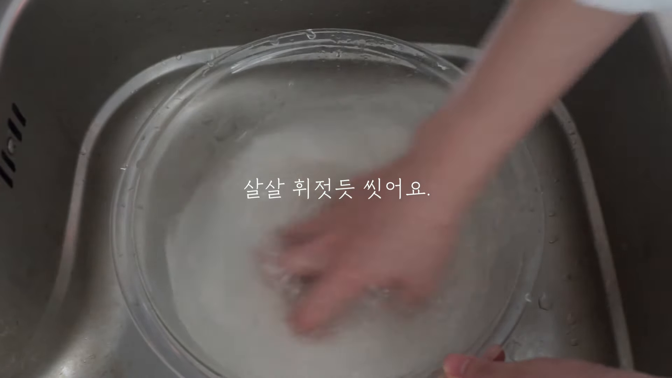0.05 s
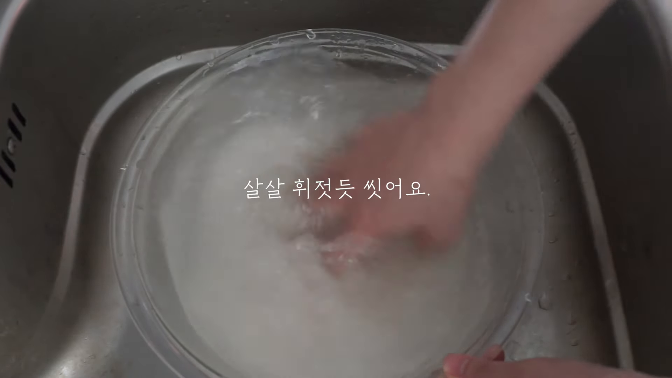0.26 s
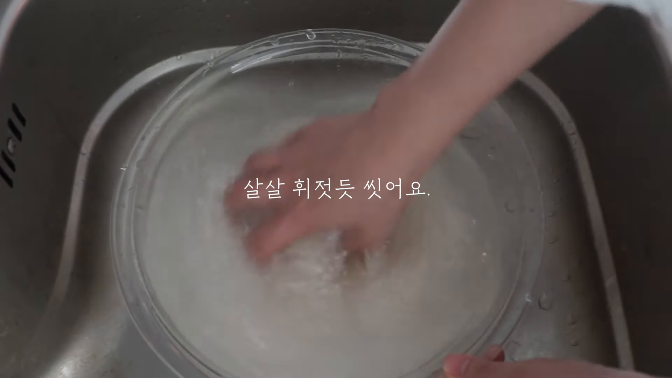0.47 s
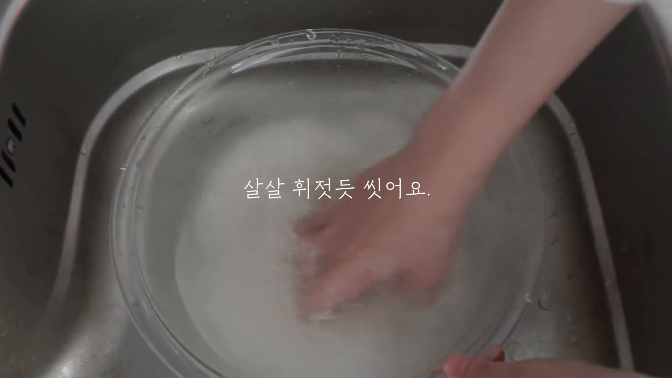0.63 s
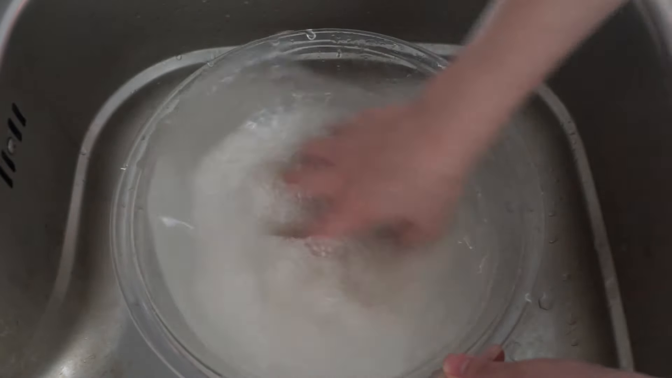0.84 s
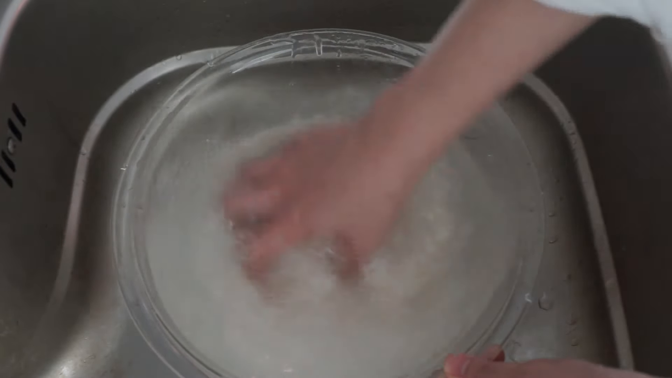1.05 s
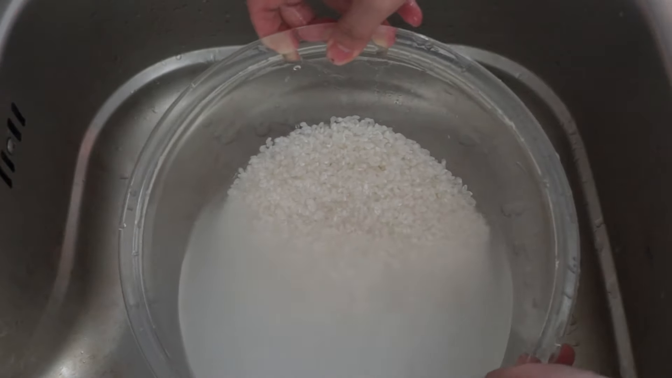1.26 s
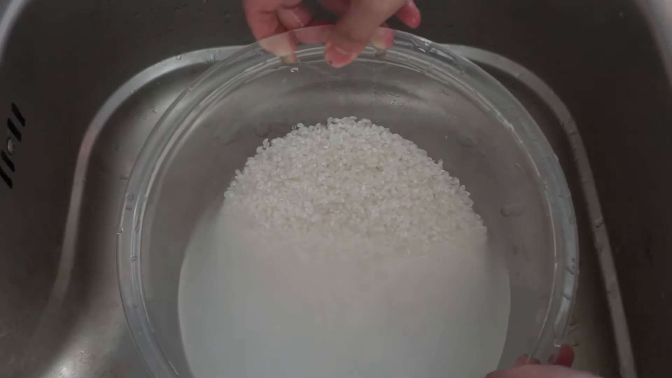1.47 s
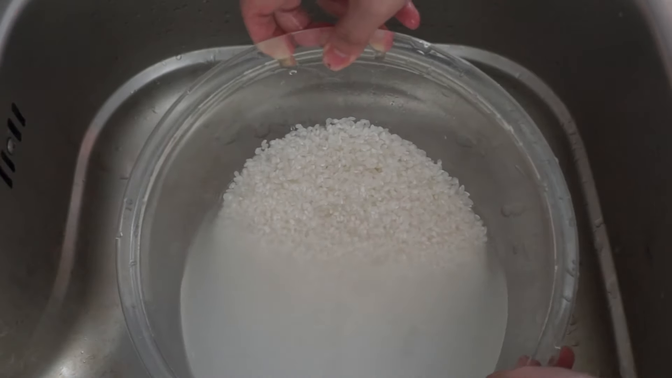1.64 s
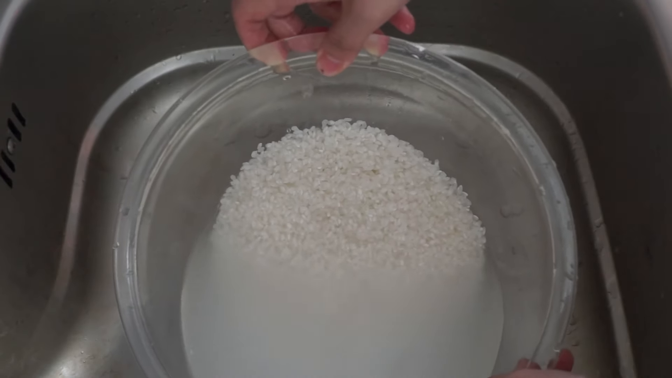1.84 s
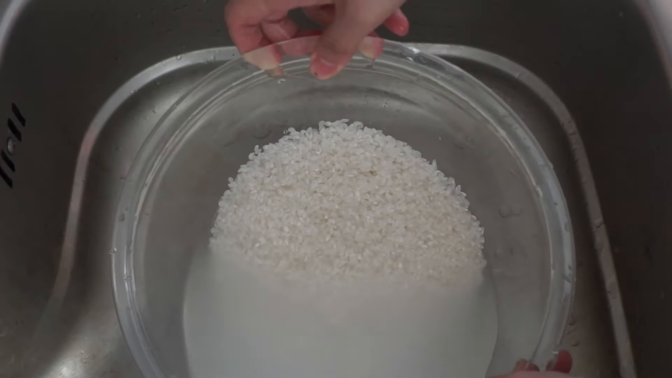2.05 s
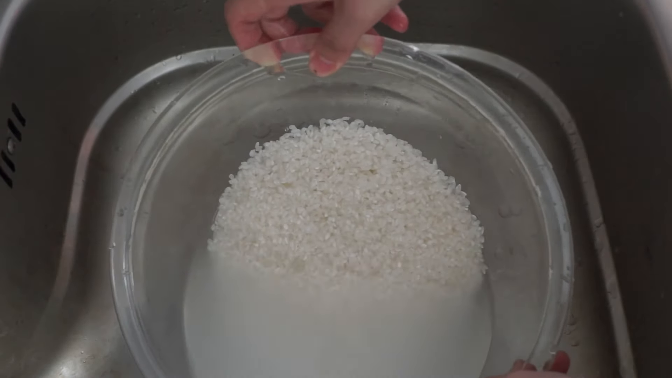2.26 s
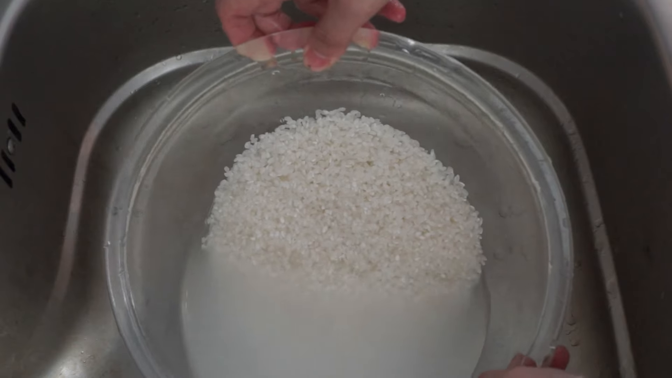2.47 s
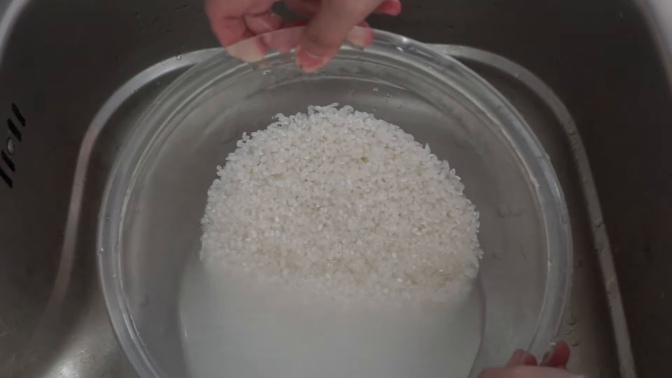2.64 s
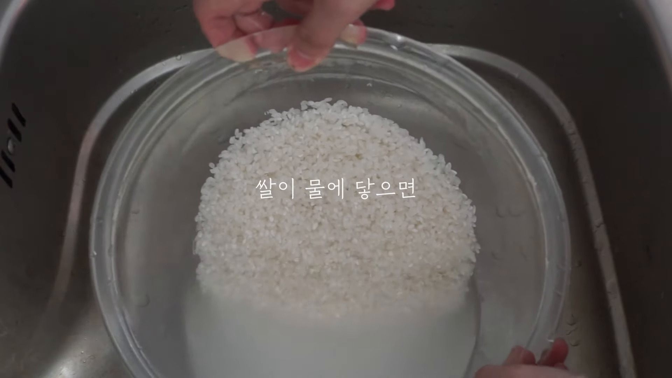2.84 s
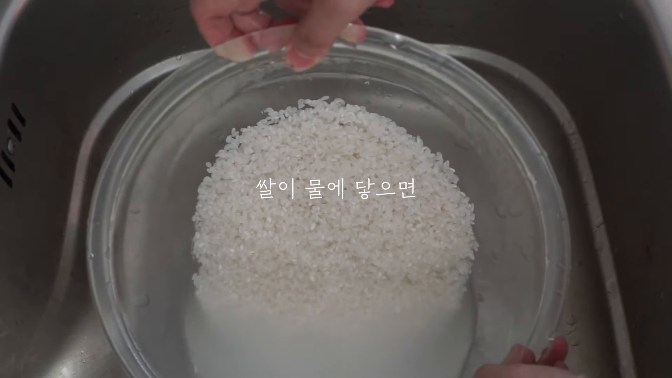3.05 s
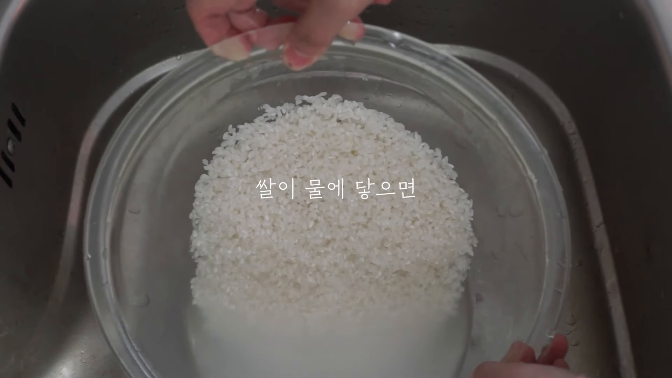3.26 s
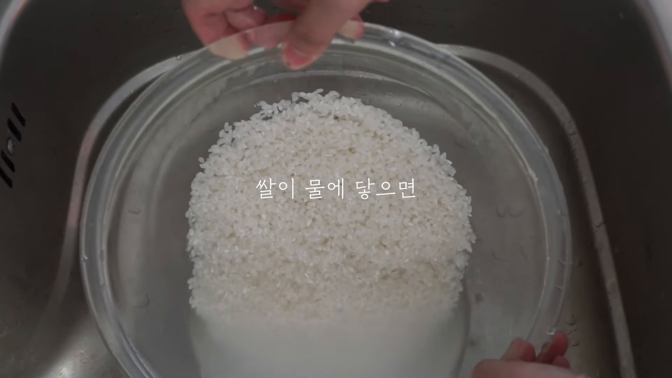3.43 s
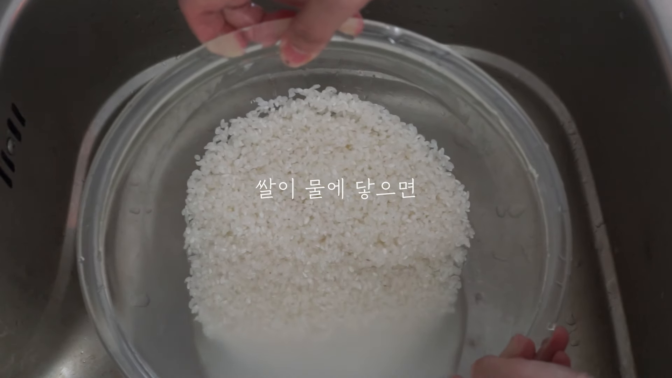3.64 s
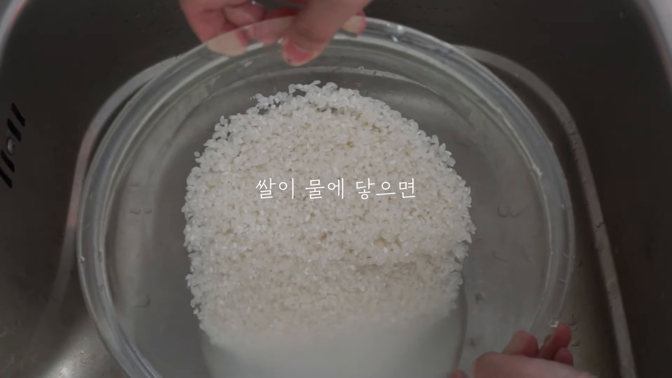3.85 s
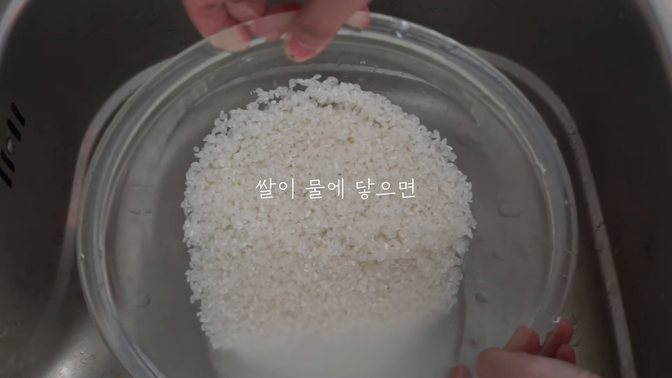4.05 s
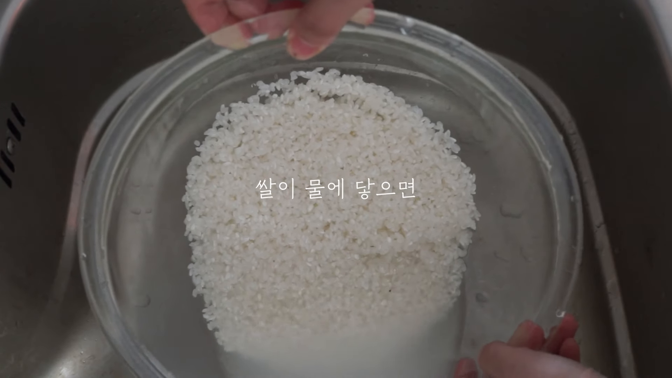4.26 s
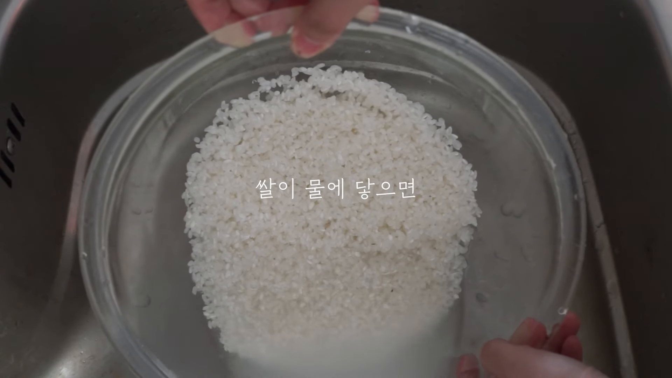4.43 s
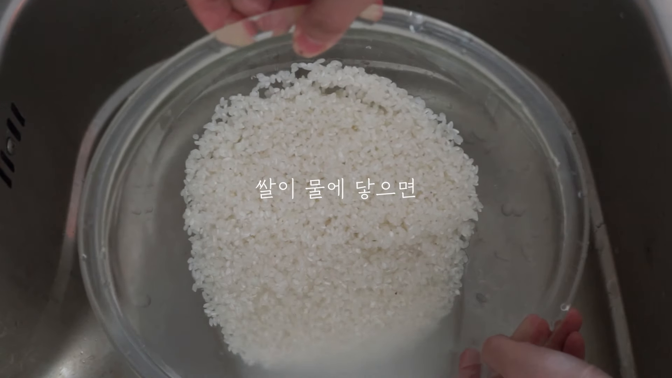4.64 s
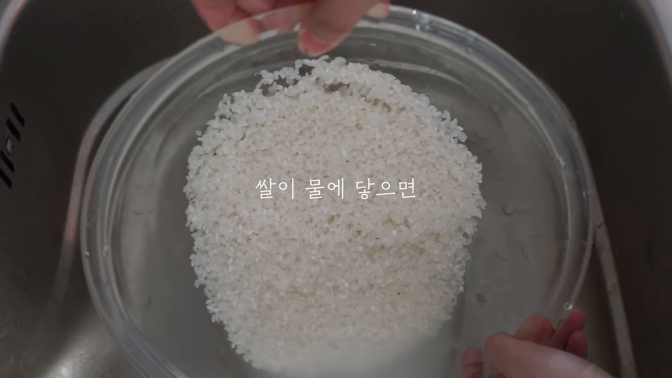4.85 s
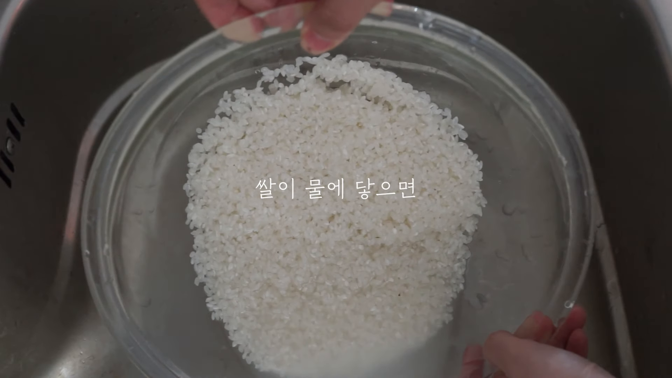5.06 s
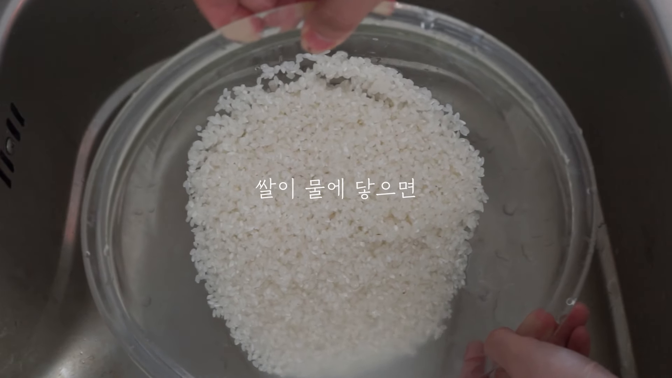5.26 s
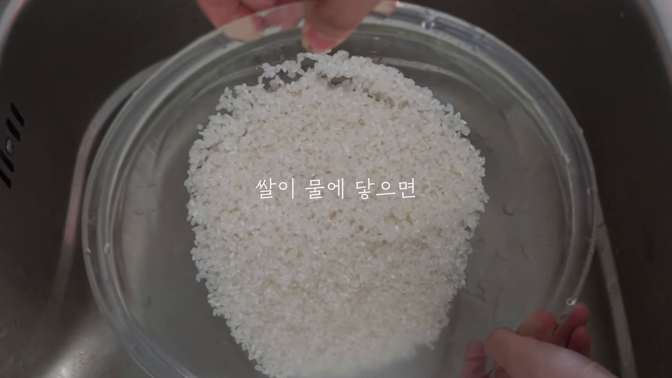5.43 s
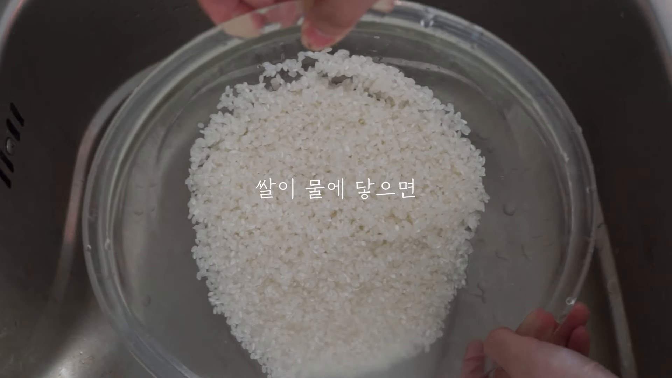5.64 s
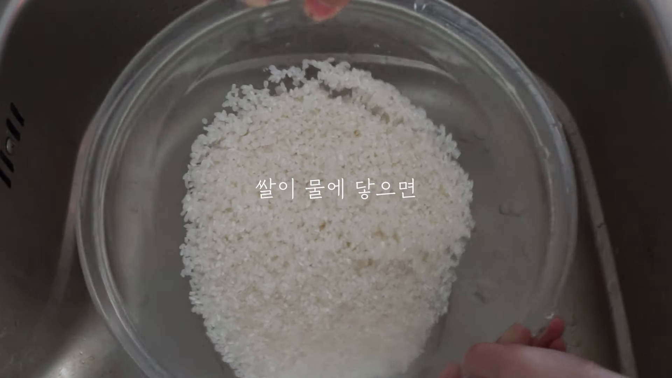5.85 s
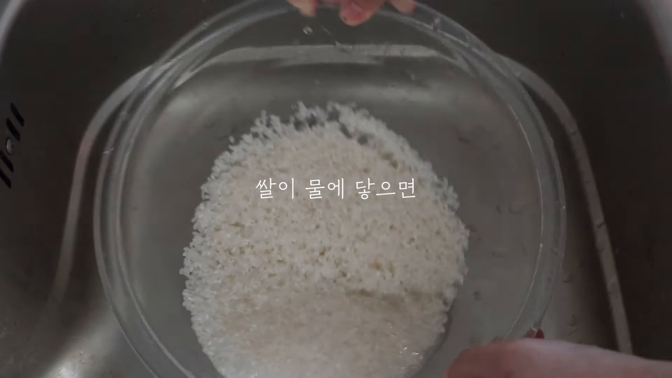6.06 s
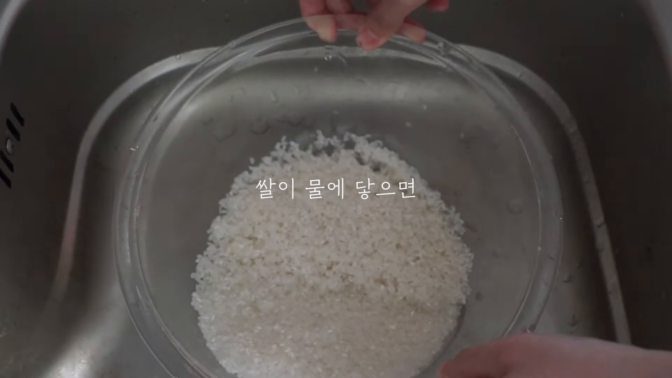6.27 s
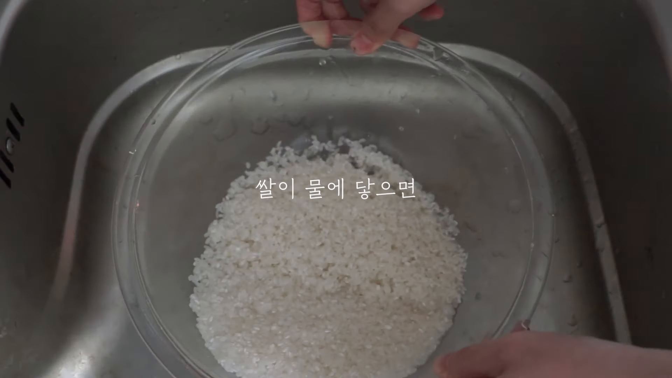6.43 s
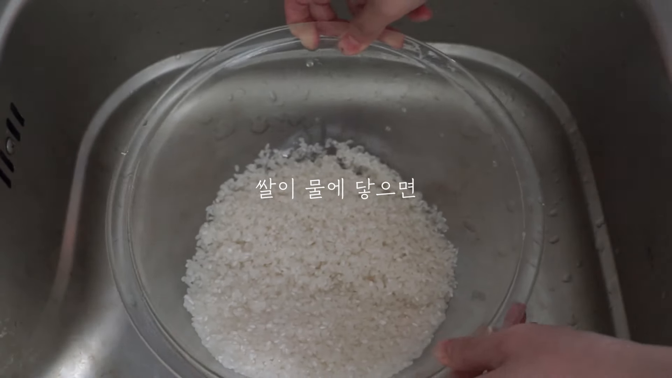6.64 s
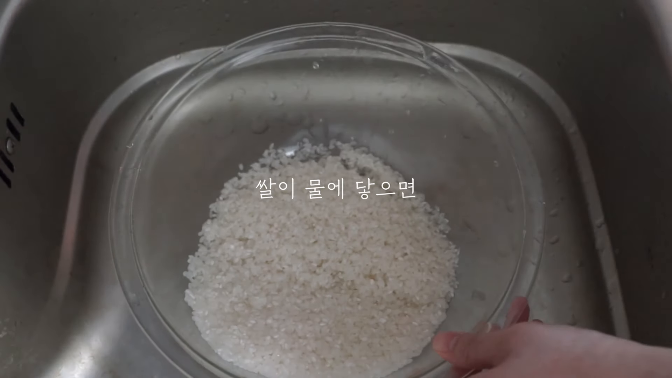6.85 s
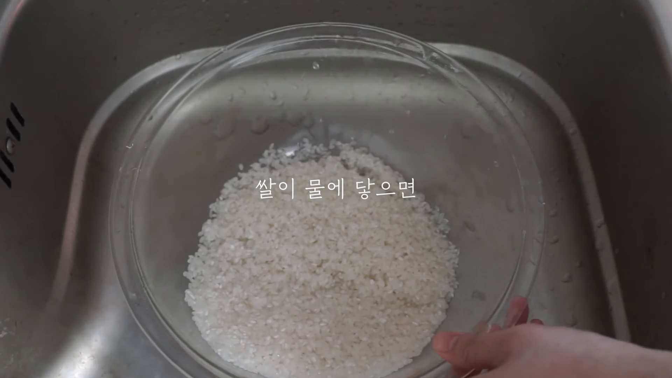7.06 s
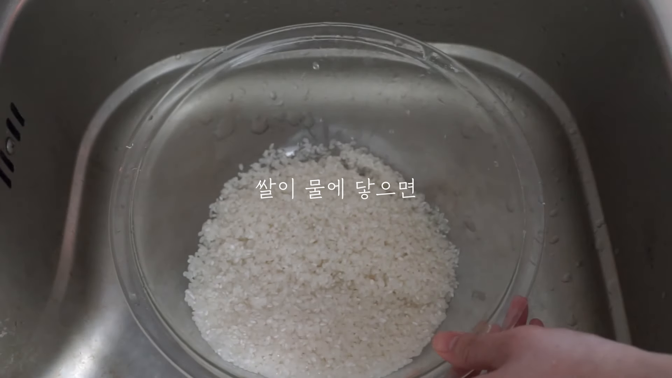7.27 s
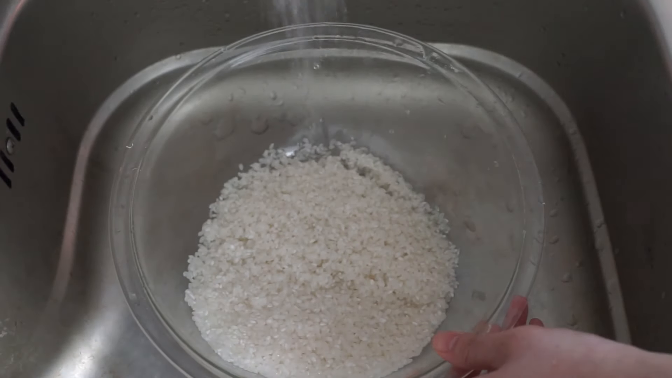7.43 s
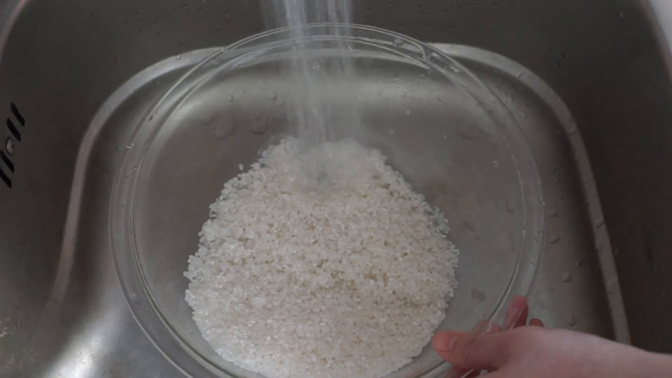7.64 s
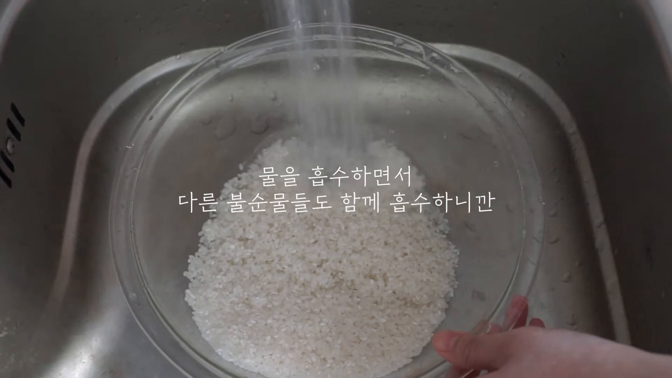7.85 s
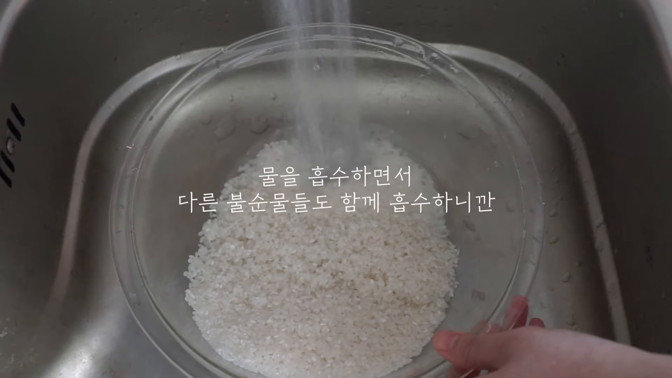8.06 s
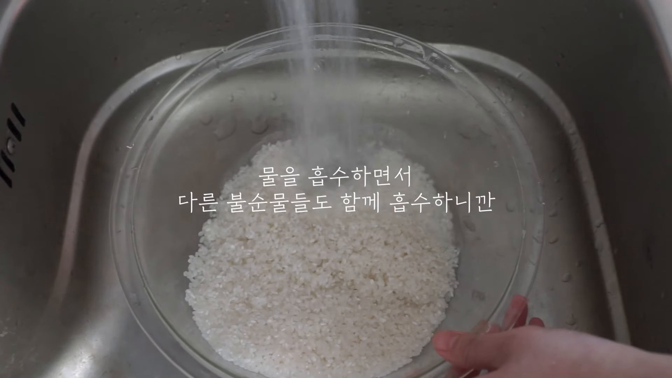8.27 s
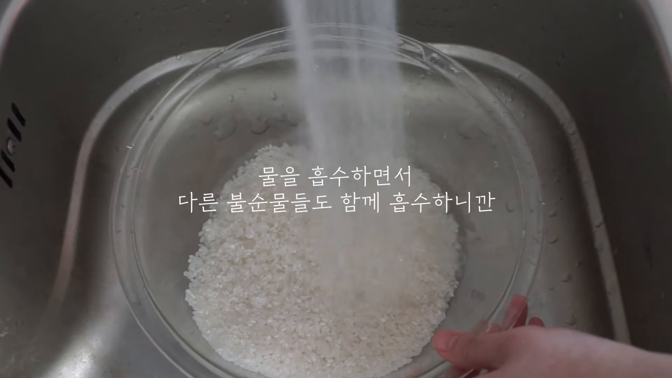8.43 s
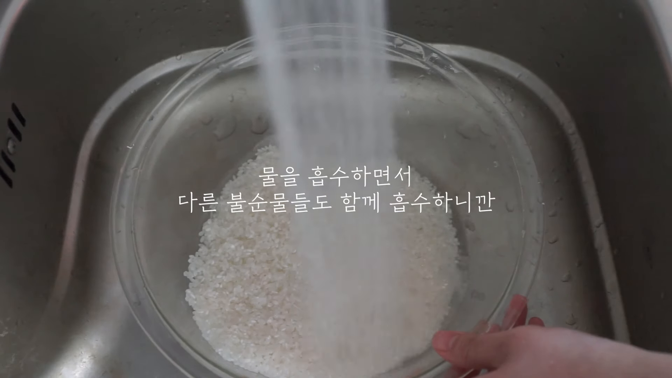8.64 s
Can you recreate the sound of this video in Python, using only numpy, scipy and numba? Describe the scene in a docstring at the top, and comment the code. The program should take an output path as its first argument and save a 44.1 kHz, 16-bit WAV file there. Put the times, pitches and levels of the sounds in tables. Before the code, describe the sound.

Lively wet swirling and gulping for about a second, then a hard cut to water spilling from a bowl onto a ringing steel sink floor, bubbling, splashing and slowly dwindling to a trickle. Two glass-on-metal knocks follow, a short pause, several sharp tap spurts, then a steady bright hiss with low glugs. Close stereo microphone, small reflective kitchen, soft room hum.

```python
"""A hand swishes rice in a glass bowl of water: bubble clouds, gulps and a crackle of noise droplets.
The bowl is tilted and water patters into a steel sink, thinning to a trickle: resonators, bubbles and spray.
The bowl is set down with two knocks: noise cracks over damped modes. The tap then spits noise bursts and
sprays onto the rice, hissing and glugging. Basin echoes, a room tail and a faint kitchen hum surround it all."""
import sys
import numpy as np
from scipy import signal
from scipy.fft import rfft, irfft
from scipy.io import wavfile
from scipy.ndimage import uniform_filter1d
from numba import njit

SR = 44100
rng = np.random.default_rng(int(sys.argv[2]) if len(sys.argv) > 2 else 0)


def file_out(sig):
    """Save sig as 16-bit WAV at sys.argv[1]."""
    # one column per channel
    cols = np.atleast_2d(sig).T
    # limit, then scale
    lim = np.clip(cols, -1, 1)
    pcm = np.round(lim * 32767).astype(np.int16)
    wavfile.write(sys.argv[1], SR, pcm)


N = 383669

STIR_END_S, TAP_ON_S = 1.175, 7.279

# Air pockets closing under the hand. Each row: start in seconds, level in dB, pitch in Hz, splash level in dB.
SLOSH_EVENTS = [(0.007, -8, 1130, -12), (0.056, -15.5, 1300, -21), (0.066, -8.5, 755, -27),
                (0.072, -6.5, 2690, -25), (0.093, -10, 1020, -31), (0.272, -12, 2235, -37),
                (0.285, -13, 1255, -48), (0.338, -13, 2880, -40), (0.383, -10, 885, -28),
                (0.495, -11, 1154, -38), (0.517, -16, 950, -38), (0.626, 0, 2930, -21.5),
                (0.635, -9, 860, -34), (0.66, -10, 1970, -24), (0.719, -11, 1010, -22),
                (0.797, -5.5, 1073, -16), (0.852, -7.5, 2360, -19.5), (0.865, -5, 3910, -16),
                (0.928, -14.5, 796, -16), (0.946, -13, 1290, -14), (0.992, -12, 2540, -28),
                (1.021, -13.5, 975, -12), (1.071, -7, 1500, -43), (1.16, -12.5, 1340, -24.5)]
# Pouring off in two tilts, then a trickle. Each row: time in seconds, flow in dB.
POUR_FLOW = [(1.2, -40.5), (1.3, -32.5), (1.36, -23.5), (1.66, -29), (2.0, -26), (2.54, -24), (2.69, -34.5),
             (2.81, -33), (2.91, -26), (3.4, -27.5), (3.9, -26.5), (4.3, -31), (4.75, -39), (5.1, -38),
             (5.33, -38), (5.85, -44), (6.05, -46), (6.48, -55)]
# Steel under the stream; its note moves with the load of water.
# Each row: time in seconds, patter level in dB, note level in dB, note in Hz.
STEEL_FLOOR = [(1.22, -69, -49, 277), (1.7, -51.5, -47, 237), (2.17, -41.5, -44, 194),
               (2.55, -43.5, -41.5, 263), (2.85, -47, -49.5, 287), (3.14, -39.5, -41.5, 259),
               (3.7, -44, -46, 314), (3.95, -46, -33, 402), (4.12, -49.5, -39, 420), (4.45, -58, -42, 442),
               (5.3, -57.5, -49.5, 440), (6.45, -73, -61, 470)]
# Spectrum of the poured water. Each row: frequency in Hz, gain in dB.
POUR_SPECTRUM = [(250, -21), (700, -12.5), (1100, 1), (3600, -2), (11000, -7.5), (15500, -9.5)]


def undb(db):
    """Decibels to amplitude gain."""
    return 10 ** (np.asarray(db) / 20)


def curves(table):
    """Each column of a table, joined by straight lines in time."""
    s, *columns = np.transpose(table)
    return [np.interp(np.arange(N) / SR, s, c) for c in columns]


def between(start_s, end_s, edge_s=0.00043):
    """A gate with straight edges."""
    t = np.arange(N) / SR
    return np.clip(np.minimum(t - start_s, end_s - t) / edge_s, 0, 1)


def add(out, s, sound):
    """Mix a sound in at time s."""
    i = max(int(s * SR), 0)
    out[i:i + len(sound)] += sound[:max(N - i, 0)]


def colour(x, points, size=2048):
    """Causal minimum-phase filter with the given (Hz, dB) response, by folding the cepstrum."""
    hz, db = np.transpose(points)
    bin_hz = np.arange(size // 2 + 1) * SR / size
    log_gain = np.log(undb(np.interp(np.log(bin_hz + 1), np.log(hz), db)))
    cepstrum = irfft(log_gain)
    fold = 1 + np.sign(size / 2 - np.arange(size))
    fold[0] = 1
    impulse = irfft(np.exp(rfft(cepstrum * fold)))
    return signal.fftconvolve(x, impulse)[:len(x)]


def unit(x, band):
    """Scale to rms 1 within a named band."""
    edges_hz = {"steel": (140, 520), "gurgle": (600, 2000),
                "bubbles": (1000, 5000), "spray": (5000, 15000)}[band]
    band_pass = signal.butter(3, edges_hz, "band", fs=SR, output="sos")
    return x / np.std(signal.sosfilt(band_pass, x))


def walk(rate_per_s):
    """Slow chance: random levels joined by straight slews, standard deviation 1."""
    k = int(SR / rate_per_s)
    levels = np.repeat(rng.standard_normal(N // k + 1), k)
    w = uniform_filter1d(levels, k)[:N]
    return w / np.std(w)


def fade(t60_s, size=22050):
    """Exponential decay, 60 dB in t60_s."""
    return undb(-60 * np.arange(size) / SR / t60_s)


def surge(start_s, attack_s, t60_s):
    """A straight rise to 1, then an exponential fall."""
    age_s = np.arange(N) / SR - start_s
    return np.clip(age_s / attack_s, 0, 1) * undb(-60 * np.maximum(age_s - attack_s, 0) / t60_s)


def burst(t60_s, points):
    """A dying rush of coloured noise, peak 1."""
    envelope = fade(t60_s)
    x = colour(rng.standard_normal(len(envelope)) * envelope, points)
    return x / np.abs(x).max()


def bubble(hz, cycles, glide, swell=1):
    """A bubble swells within a few cycles and rings out, rising in pitch as it nears the surface."""
    turn = np.arange(int(cycles * SR / hz) + 2) * hz / SR
    age = turn / cycles
    tone = np.sin(2 * np.pi * turn * (1 + glide * age / 2))
    return tone * undb(-60 * age) * (1 - np.exp(-(turn / swell) ** 2))


def sizes(chance, spread_db):
    """Many small, few large: uniform chance to bounded exponential decibels."""
    return undb(-spread_db * np.log(.02 + chance))


def bubbles(count, lo_hz, hi_hz, cycles, spread_db, glide):
    """A cloud of bubbles of many sizes, with even power per Hz, rms 1."""
    out = np.zeros(N)
    when, pitch, size, life = rng.random((count, 4)).T
    hz = lo_hz * (hi_hz / lo_hz) ** pitch
    for s, f, a, c in zip(when * N / SR, hz, sizes(size, spread_db), cycles * (.5 + life)):
        add(out, s, a * f * bubble(f, c, glide))
    return out / np.std(out)


def droplets(per_s, spread_db, clump_db, splash_s=0.0037):
    """Tiny impacts whose sizes swell in clumps, each a very short rush of noise; rms 1."""
    hit, size = rng.random((2, N))
    impacts = (hit < per_s / SR) * sizes(size, spread_db) * undb(clump_db * walk(70))
    decay = np.exp(-2 / (splash_s * SR))
    power = signal.lfilter([1], [1, -decay], impacts ** 2 + 1e-18)
    x = np.sqrt(power) * rng.standard_normal(N)
    return x / np.std(x)


@njit
def resonate(x, hz, width_hz):
    """State-variable band-pass with a moving centre."""
    y, b, l = np.empty(len(x)), 0., 0.
    for i in range(len(x)):
        g, k = np.tan(np.pi * hz[i] / SR), width_hz / hz[i]
        v = (b + g * (x[i] - l)) / (1 + g * (g + k))
        b, l, y[i] = 2 * v - b, l + 2 * g * v, k * v
    return y


def plop(hz, ring_s, glide, scatter_oct, brood_db, count=7):
    """One main bubble, then a brood of others as the pocket breaks up; peak 1."""
    out = np.zeros(SR // 4)
    # ring_s is the t60 at 1 kHz; higher pitches ring shorter
    add(out, 0, bubble(hz, hz * ring_s * np.sqrt(1000 / hz), glide, swell=1.25))
    for delay, pitch, size in rng.random((count, 3)):
        brood_hz = hz * 2 ** (scatter_oct * (pitch - .35))
        add(out, .018 * delay, undb(brood_db) * size * bubble(brood_hz, 54, glide, swell=1.22))
    return out / np.abs(out).max()


def kitchen():
    """Coloured-noise room air and a wavering hum, stronger during the pour and weak under the tap."""
    # Spectrum of the air. Each row: frequency in Hz, gain in dB.
    air_spectrum = [(40, -40), (100, -15.5), (270, -3.5), (560, 0), (1100, -9), (3500, -11.5), (15000, -31)]
    # Appliance hum. Each row: frequency in Hz, relative level in dB.
    hum_tones = [(272, -68), (409, -65), (624, -59)]
    t = np.arange(N) / SR
    air = undb(-60.5) * unit(colour(rng.standard_normal(N), air_spectrum), "steel")
    hum = 0
    for hz, db in hum_tones:
        tone = np.sqrt(2) * np.sin(2 * np.pi * hz * t + 1.27 * walk(18))
        hum = hum + undb(db + 1.3 * walk(12)) * tone
    presence_db = curves([(1.16, 7), (1.19, 12), (7.5, 10.5), (7.7, -3)])[0]
    return (air + hum) * undb(presence_db)


def reflections(t60_s, delay_s, size=22050):
    """A diffuse tail of unit energy: decaying noise after a short delay."""
    tail = rng.standard_normal(size) * fade(t60_s, size) * (np.arange(size) > delay_s * SR)
    return tail / np.sqrt(np.sum(tail ** 2))


def surroundings(dry, size=2048):
    """The basin's quick echoes change as the splashes land on new spots; the room's tail stays the same."""
    near, window = np.zeros(N), np.sin(np.pi * np.arange(size) / size)
    for i in range(0, N, size // 2):
        piece = dry[i:i + size]
        echo = reflections(0.022, delay_s=0.0018, size=size)
        add(near, i / SR, signal.fftconvolve(piece * window[:len(piece)], echo))
    far = signal.fftconvolve(dry, reflections(0.52, delay_s=0.0062))[:N]
    return dry + undb(-5.0) * near + undb(-11.5) * far


def rumble():
    """The dense ringing of the basin in octave bands; the higher the band, the sooner it dies."""
    t60_at_1khz_s, damping = 0.31, 0.23
    out = 0
    for hz in 350 * 2 ** np.arange(5):
        envelope = fade(t60_at_1khz_s * (1000 / hz) ** damping)
        band = signal.butter(2, [hz / np.sqrt(2), hz * np.sqrt(2)], "band", fs=SR, output="sos")
        out = out + signal.sosfilt(band, rng.standard_normal(len(envelope)) * envelope)
    out = colour(out, [(300, 0.0), (520, 0), (950, 6.0), (2000, -4.0), (7000, -16)])
    return out / np.abs(out).max()


def bowl():
    """The glass lands on the steel: a crack, shared modes, and a boom that sounds higher in the later knocks."""
    # Contacts. Each row: start in seconds, level in dB, contact brightness in Hz, boom in Hz,
    # boom in dB relative to the level, before a common trim.
    contacts = [(6.537, 3.5, 5000, 161, -18.5), (6.586, -12.5, 4000, 161.5, -14),
                (6.792, -7, 2500, 273, -14), (6.801, -0.5, 2160, 271.3, -10), (6.809, 1, 900, 400, -19.5)]
    # Bowl on the sink floor. Each row: frequency in Hz, relative level in dB, t60 in seconds.
    modes = [(275, -7.5, 0.28), (424, -4.5, 0.21), (590, -9, 0.38), (712, -7, 0.34), (934, -1, 0.26),
             (1034, -12, 0.43), (1310, -11, 0.22), (1390, -10, 0.13), (1620, -10, 0.19), (2360, -17, 0.26),
             (3600, -14, 0.16)]
    # Spectrum of the crack. Each row: frequency in Hz, gain in dB.
    crack_spectrum = [(80, -44), (150, 2.5), (330, -4), (1400, 3.5), (4000, -6), (15000, -22)]
    boom_t60_s = 0.32
    out = np.zeros(N)
    for s, db, bright_hz, boom_hz, boom_db in contacts:
        crack = burst(0.047, crack_spectrum)
        t = np.arange(len(crack)) / SR
        ring = 0
        for hz, mode_db, t60_s in modes:
            ring = ring + undb(mode_db) * fade(t60_s) * np.sin(2 * np.pi * (hz * t + rng.random()))
        centre_hz = np.full(len(t), boom_hz)
        shudder = resonate(resonate(rng.standard_normal(len(t)), centre_hz, 90.), centre_hz, 90.)
        boom = np.sin(2 * np.pi * boom_hz * t) + shudder / np.std(shudder)
        boom *= fade(boom_t60_s) * np.minimum(t * boom_hz, 1)
        blow = undb(-0.5) * crack + undb(-21) * ring + undb(-13.5) * rumble() + undb(boom_db - 11) * boom
        # a softer contact pushes for longer and leaves out the treble
        pole = np.exp(-2 * np.pi * bright_hz / SR)
        add(out, s, undb(db) * signal.lfilter([1 - pole], [1, -pole], blow))
    return out


def churn():
    """How hard the water is stirred, in dB: a steady swirl, a surge per stroke, a wake behind each slosh."""
    # Sweeps of the hand. Each row: start in seconds, churn in dB.
    hand_strokes = [(0.045, -26.5), (0.617, -19.5), (0.925, -17.5)]
    swirl_db, wake_db = -25.5, -26  # wake re its slosh
    strokes = sum((undb(db) * surge(s, 0.005, 0.95)) ** 2 for s, db in hand_strokes)
    wakes = sum((undb(db + wake_db) * surge(s, 0.0021, 0.063)) ** 2 for s, db, _, _ in SLOSH_EVENTS)
    return 10 * np.log10(undb(swirl_db) ** 2 + strokes + wakes)


def stirring():
    """Fingers churn the water: clumps of bubbles, gulps that break up with a splash, a crackle of grains and spray."""
    # Spectra of the churned water and of the crackle. Each row: frequency in Hz, gain in dB.
    churn_spectrum = [(150, -49), (550, -27), (750, -4.5), (1300, 1), (1750, -3), (2800, -6), (3700, -11),
                      (15500, -13.5)]
    crackle_spectrum = [(250, -41), (1000, 2), (6500, -0.5), (15500, -12)]
    clumps = bubbles(3300, 700, 6000, cycles=38, spread_db=3.1, glide=0.22) * undb(1.5 * walk(40))
    gurgle = unit(colour(clumps, churn_spectrum), "gurgle")
    crackle = unit(colour(droplets(1200, 5.2, clump_db=1), crackle_spectrum), "spray")
    out = (undb(-4.0) * gurgle + undb(-9.0) * crackle) * undb(churn())
    for s, db, hz, splash_db in SLOSH_EVENTS:
        gulp = plop(hz, ring_s=0.042, glide=0.25, scatter_oct=1.1, brood_db=-9)
        add(out, s, undb(db - 0.5) * gulp)
        add(out, s, undb(splash_db + 13.5) * burst(0.021, churn_spectrum))
    return out


def tap():
    """The tap spits, then fine jets hiss on the rice and glug where water has pooled."""
    # The tap spits air, then more and more water that splashes on the rice.
    # Each row: start in seconds, level in dB, share of water 0-1.
    spurts = [(7.2788, 0, 0.02), (7.3523, -1.5, 0.02), (7.4225, -7, 0.01), (7.441, -5.5, 0),
              (7.4638, -14, 0.04), (7.524, -8, 0.02), (7.543, -5, 0.5), (7.57, -2.5, 0.6), (7.605, -2, 0.9)]
    # Big air pockets driven into the pool by the jets. Each row: start in seconds, peak in dB, pitch in Hz.
    glugs = [(7.744, -10.5, 870), (7.768, -11.5, 860), (7.962, -10.5, 760), (8.075, -12.5, 743),
             (8.138, -12, 733), (8.189, -12.5, 744)]
    # Spectra of nozzle spurts, jets and gurgle. Each row: frequency in Hz, gain in dB.
    spurt_spectrum = [(120, -54), (500, -14), (3000, -21), (3600, -12), (4100, -13.5), (8000, -2),
                      (15500, -0.5)]
    jet_spectrum = [(150, -37.5), (1000, -15), (2100, -7), (3500, -2.5), (4400, 1), (7000, -1),
                    (15500, -5.5)]
    gurgle_spectrum = [(200, -41), (450, -11.5), (570, -20), (740, 2.5), (1180, -4.5), (1340, 1),
                       (1700, -11), (2200, -7.5)]
    jets_land_s, jets_db, jets_sag_db_per_s = 7.605, -15, 1
    nozzle_db, nozzle_rise_db_per_s = -33, 26
    pool_start_s, pool_end_s, pool_edge_s, pool_db, seep_db = 7.66, 8.48, 0.015, -22.5, -44.5
    froth_hz, froth_db = 2860, 0.5
    t = np.arange(N) / SR

    fizz = bubbles(7000, 2020, 12700, cycles=26, spread_db=2.6, glide=0.16)
    jets = droplets(4000, 2.5, clump_db=1, splash_s=0.00085) + undb(-8) * fizz
    # the froth under the jets rings at a wandering pitch
    froth = resonate(jets, froth_hz * (1 + .03 * walk(9)), 420.)
    hiss = unit(colour(jets + undb(froth_db) * froth, jet_spectrum), "spray")
    # the hiss sags as the rice is covered
    hiss *= undb(jets_db - jets_sag_db_per_s * (t - jets_land_s))
    pockets = bubbles(13000, 380, 2640, cycles=15, spread_db=2.1, glide=0.1)
    gurgle = unit(colour(pockets, gurgle_spectrum), "gurgle")
    gurgle *= undb(seep_db) + undb(pool_db) * between(pool_start_s, pool_end_s, pool_edge_s)
    # until the jets reach the bowl only the nozzle's thin hiss sounds under the spurts
    nozzle = unit(colour(jets, spurt_spectrum), "spray")
    nozzle *= undb(nozzle_db + nozzle_rise_db_per_s * (t - TAP_ON_S))
    out = nozzle * between(TAP_ON_S, jets_land_s) + (hiss + gurgle) * between(jets_land_s, np.inf)

    for s, db, wet in spurts:
        wet = np.clip(wet, 0, 1)
        spit = np.sqrt(1 - wet) * burst(0.067, spurt_spectrum) + np.sqrt(wet) * burst(0.12, jet_spectrum)
        add(out, s, undb(db + 1.0) * spit)
    for s, db, hz in glugs:
        add(out, s, undb(db) * plop(hz, ring_s=.04, glide=.1, scatter_oct=1, brood_db=-14))
    return out


def thumps():
    """Heavy drops land with a dull splat and ring the note of the sink floor."""
    # Heavy drops. Each row: start in seconds, level in dB.
    heavy_drops = [(2.436, -11), (2.727, -16), (3.088, -12), (3.672, -9), (3.933, -16.5), (4.021, -19),
                   (4.781, -19.5), (5.12, -20)]
    # Spectrum of the splat. Each row: frequency in Hz, gain in dB.
    splat_spectrum = [(50, -47), (150, -23), (300, -5.5), (1000, -1), (1600, -13), (4000, -22)]
    out = np.zeros(N)
    times_s, _, _, notes_hz = np.transpose(STEEL_FLOOR)
    for s, db in heavy_drops:
        splat = burst(0.092, splat_spectrum)
        note_hz = np.interp(s, times_s, notes_hz)
        ring = fade(0.22) * np.sin(2 * np.pi * note_hz * np.arange(len(splat)) / SR)
        add(out, s, undb(db - 1.5) * splat + undb(db - 14.5) * ring)
    return out


def thread(count=19):
    """The last thread of water traps uneven bubbles of nearly one size: rows of (s, level dB, pitch Hz)."""
    start_s, end_s, centre_hz, top_db = 4.92, 5.45, 1365, -29
    scatter_oct, scatter_db = 0.084, 14
    late, size, pitch = rng.random((count, 3)).T
    s = start_s + (end_s - start_s) * (np.arange(count) + 2 * late - .5) / count
    db = top_db + scatter_db * (size - 1)
    hz = centre_hz * 2 ** (scatter_oct * (pitch - .5))
    return list(zip(s, db, hz))


def drops():
    """Single drops that stand out of the stream: plops, ticks on bare steel and long-ringing bubbles."""
    # Blobs of water landing in the sink. Each row: start in seconds, level in dB, pitch in Hz.
    blobs = [(1.238, -17.5, 3180), (1.357, -12, 2610), (1.3997, -10, 3110), (1.468, -6.5, 1210),
             (1.543, -12, 2700), (1.745, -15, 1835), (1.969, -15, 1556), (2.036, -9, 1406),
             (2.139, -14, 4220), (2.296, -14, 3050), (2.435, -10, 4140), (2.5, -4, 4130),
             (2.534, -10, 3770), (2.67, -22, 1175), (2.758, -15, 1364), (2.841, -15, 1525),
             (2.919, -9, 3600), (3.031, -9, 3530), (3.118, -7, 1657), (3.293, -7, 3020), (3.465, -13, 4000),
             (3.577, -8.5, 2000), (3.879, -7, 2550), (4.018, -6.5, 1810), (4.117, -8.5, 2354),
             (4.281, -21.5, 3580), (4.99, -22, 3530), (5.324, -21, 3930), (5.441, -15, 3880),
             (5.533, -28, 3220), (5.658, -21, 3340), (5.687, -21.5, 3530), (5.929, -13.5, 6100),
             (6.132, -24.5, 1900), (6.298, -22.5, 1070)]
    # Drops bursting on bare steel. Each row: start in seconds, level in dB.
    ticks = [(2.5008, -5), (3.785, -9), (4.8932, -8.5), (5.055, -19), (5.241, -14), (5.9302, -7.5)]
    # Lone large bubbles ringing long in a puddle. Each row: start in seconds, level in dB, pitch in Hz.
    drips = [(1.891, -24, 1033), (5.275, -27, 1340), (5.33, -22, 1333), (5.536, -25.5, 1425),
             (5.604, -30.5, 1360), (5.752, -29.5, 1440)]
    out = np.zeros(N)
    for s, db, hz in blobs:
        ring = plop(hz, ring_s=.055, glide=.08, scatter_oct=.8, brood_db=-8)
        splash = burst(0.11, POUR_SPECTRUM)[:len(ring)]
        add(out, s, undb(db - 1.0) * ring + undb(db - 11.5) * splash)
    for s, db in ticks:
        add(out, s, undb(db - 3.5) * burst(0.11, [(300, -39), (4000, 0.0), (7000, 11), (15000, 4)]))
    for s, db, hz in drips + thread():
        add(out, s, undb(db - 8.0) * burst(0.036, POUR_SPECTRUM))
        add(out, s, undb(db) * bubble(hz, cycles=170, glide=0.067))
        # a second, slightly smaller bubble beats against the first
        delay_s = .018 * rng.random()
        second_hz = hz * (1 + 0.093 * rng.random())
        add(out, s + delay_s, undb(db - 1.0) * bubble(second_hz, cycles=190, glide=0.056))
    return out


def flow():
    """Flow in dB and typical bubble pitch: each gush adds to the stream and pulls the pitch towards its own."""
    # Gushes in the stream. Each row: start in seconds, length in seconds, level in dB, bubble pitch in Hz.
    gushes = [(1.475, 0.072, -24.5, 1600), (3.09, 0.086, -24, 1880), (3.512, 0.1, -20.5, 2280),
              (3.706, 0.098, -22.5, 2310), (3.864, 0.11, -23.5, 2300), (3.998, 0.082, -28.5, 2080),
              (4.398, 0.1, -31.5, 2300), (4.634, 0.057, -35, 2640), (5.212, 0.035, -23, 4000),
              (5.858, 0.12, -34, 3930), (6.124, 0.16, -41, 2070)]
    stream_bubble_hz, edge_s = 3390, 0.0047
    gouts_per_s, gout_db = 45, 2.0  # the stream breaks into uneven gouts
    power = undb(curves(POUR_FLOW)[0] + gout_db * walk(gouts_per_s) - 1) ** 2
    pull = power * stream_bubble_hz
    for s, length_s, db, hz in gushes:
        gate = between(s - edge_s / 2, s + length_s + edge_s / 2, edge_s)
        gush = (undb(db) * gate) ** 2
        power, pull = power + gush, pull + gush * hz
    return 10 * np.log10(power), pull / power


def pouring():
    """Water falls from the rim: it patters on the steel and rings it, traps bubbles and throws spray."""
    spray_pivot_db, spray_slope = -14, 0.91  # spray in dB per dB of steady flow
    flow_db, bubble_hz = flow()
    patter_db, note_db, note_hz = curves(STEEL_FLOOR)

    feet = droplets(600, 2.6, clump_db=2.0)
    note = unit(resonate(resonate(feet, note_hz, 70.), note_hz, 110.), "steel")
    pockets = bubbles(3000, 600, 1700, cycles=36, spread_db=2.5, glide=0.1)
    # Spectrum of the patter. Each row: frequency in Hz, gain in dB.
    patter_spectrum = [(70, -20), (150, -16), (270, 2), (500, 2), (1150, 2.5), (1600, -6.5), (4000, -18)]
    patter = unit(colour(feet + undb(-13.5) * pockets, patter_spectrum), "gurgle")
    drum = note * undb(note_db) + undb(7) * patter * undb(patter_db)

    # a full stream traps a dense cloud of bubbles, a thin one only separate plinks
    full = np.clip((flow_db + 36.0) / 12, 0, 1)
    cloud = bubbles(9000, 900, 5500, cycles=48, spread_db=2.6, glide=0.05)
    separate = bubbles(1600, 1200, 6500, cycles=64, spread_db=4.4, glide=0.05)
    trapped = np.sqrt(full) * cloud + np.sqrt(1 - full) * separate
    plinks = unit(resonate(trapped, bubble_hz, 1000.0), "bubbles")
    small = bubbles(7500, 856, 8000, cycles=40, spread_db=3.9, glide=0.05)
    fizz = unit(colour(small, POUR_SPECTRUM), "bubbles")

    # the spray sparkles: tiny droplets tick, each at its own pitch
    sparkle = undb(2) * bubbles(3600, 5000, 14500, cycles=26, spread_db=5.5, glide=0.1)
    spray = unit(colour(droplets(600, 2.4, clump_db=2.5) + sparkle, POUR_SPECTRUM), "spray")
    spray_db = spray_pivot_db + spray_slope * (curves(POUR_FLOW)[0] - spray_pivot_db)
    stream = (undb(-2.5) * plinks + undb(-8.5) * fizz) * undb(flow_db)
    stream += undb(-7.0) * spray * undb(spray_db)
    return (drum + stream) * between(STIR_END_S, TAP_ON_S)


def scene():
    """All the water and the bowl ring in basin and room; the stirring stops abruptly; splashes spread sideways."""
    # Stereo width. Each row: frequency in Hz, side gain in dB before the spread below.
    width_spectrum = [(150, -33.5), (700, -20.5), (2300, -22.5), (4400, -6), (8000, -5), (15000, -11)]
    stirred = surroundings(stirring())
    rinsed = surroundings(pouring() + drops() + thumps() + bowl() + tap())
    mid = stirred * between(0, STIR_END_S) + rinsed + kitchen()
    # the tap's jet falls in the middle, so the image narrows when it lands
    spread_db, = curves([(7.55, -0.5), (7.62, -16)])
    side = colour(mid * walk(310), width_spectrum) * undb(spread_db)
    return np.array([undb(-2.06) * mid + side, undb(-2.34) * mid - side])


def record(dry):
    """The microphone thins the bass, the loudest peaks clip and the top is cut."""
    low_cut_hz, top_hz = 70, 15900
    thinned = signal.sosfilt(signal.butter(1, low_cut_hz, "high", fs=SR, output="sos"), dry)
    top_cut = signal.ellip(10, .2, 70, top_hz, fs=SR, output="sos")
    return signal.sosfilt(top_cut, np.clip(thinned, -1, 1))


dry = scene()
out = record(dry)
file_out(out)
```